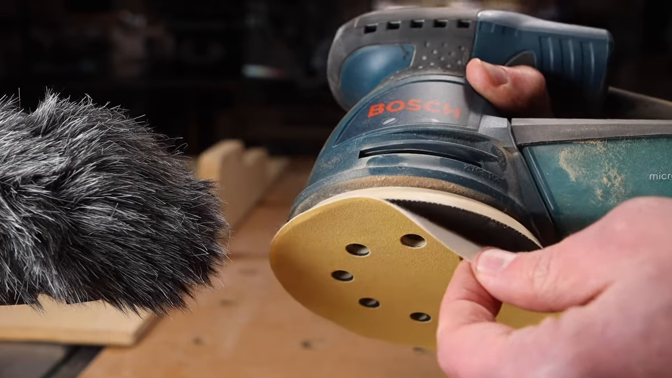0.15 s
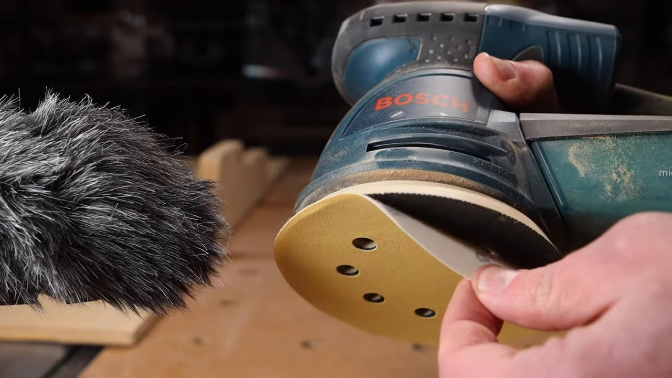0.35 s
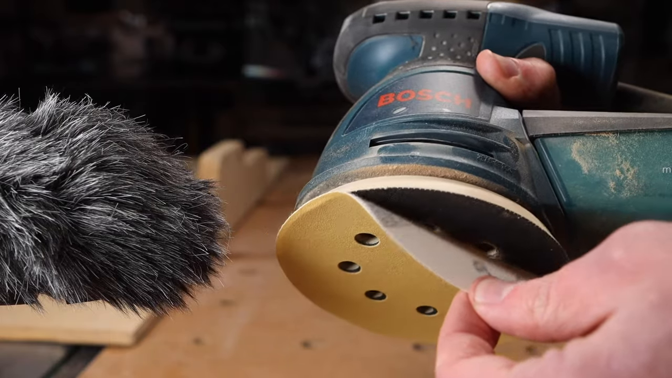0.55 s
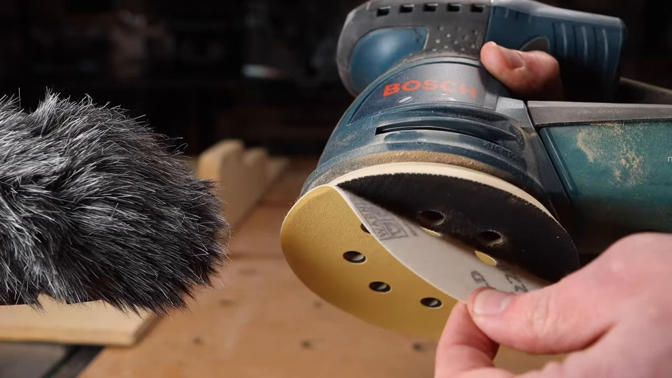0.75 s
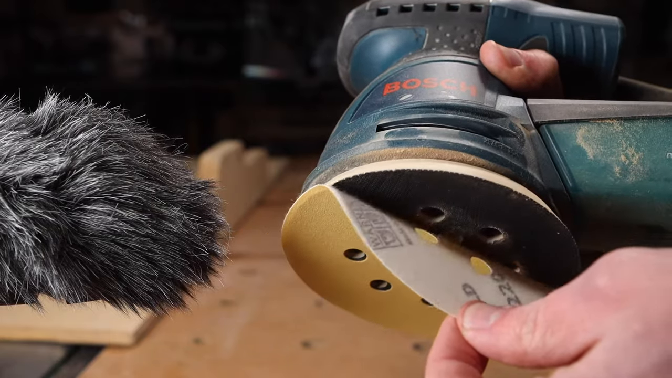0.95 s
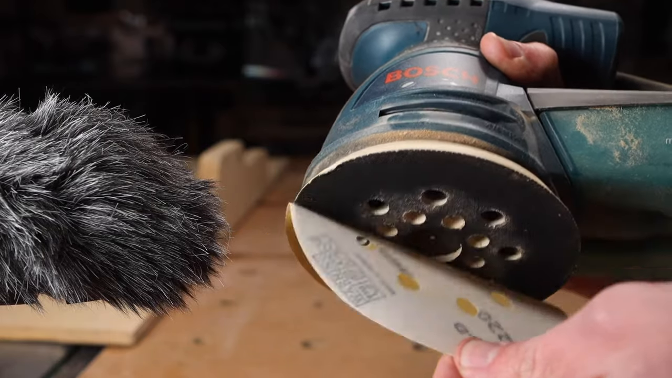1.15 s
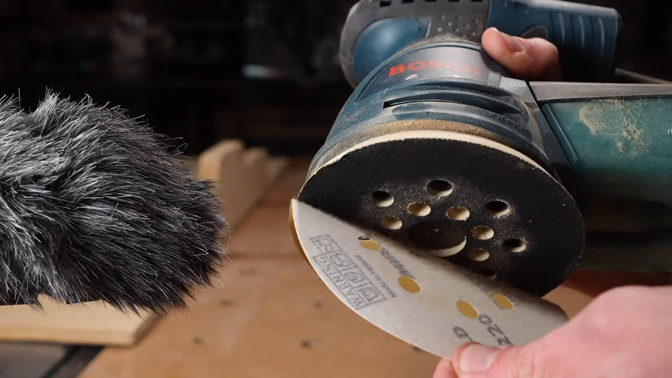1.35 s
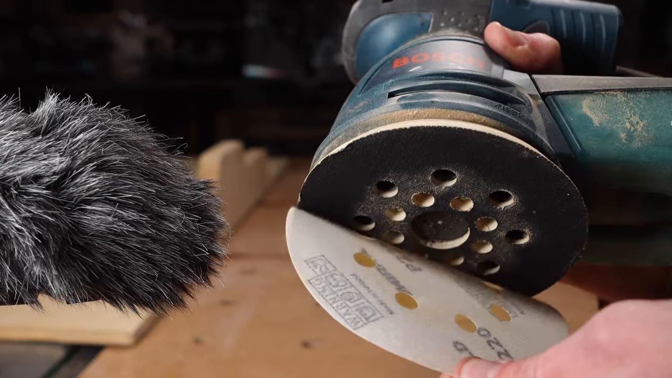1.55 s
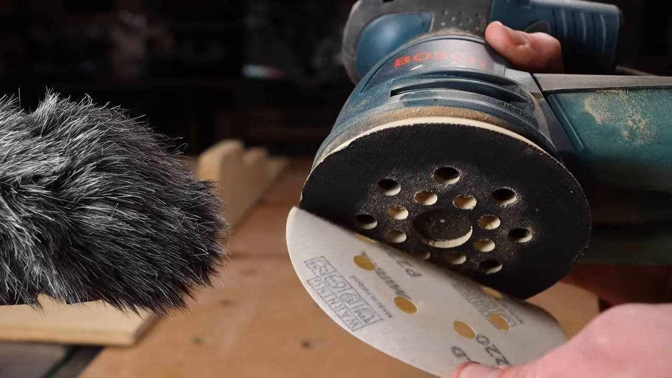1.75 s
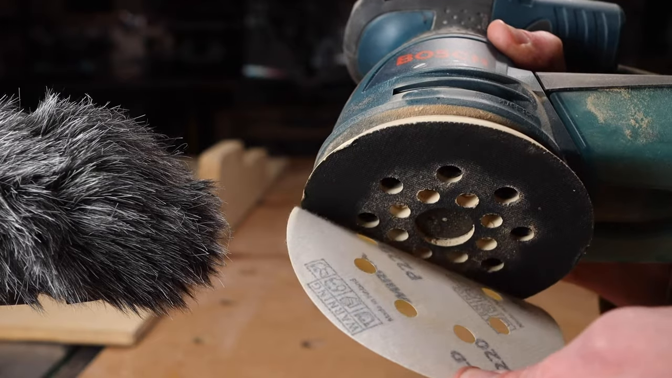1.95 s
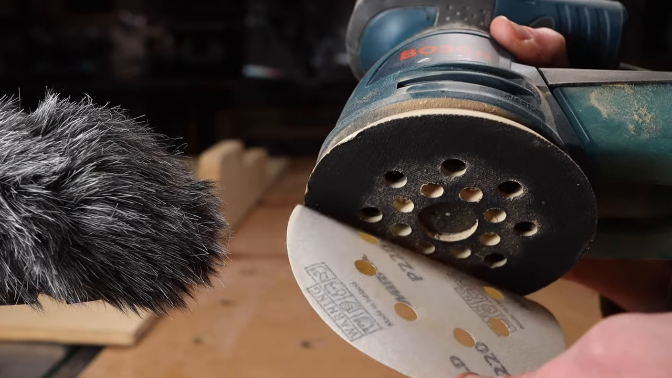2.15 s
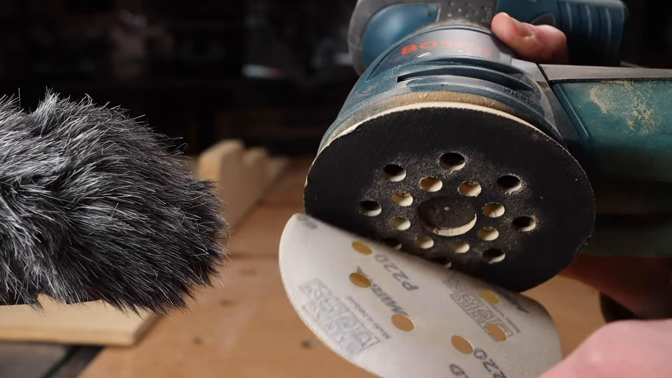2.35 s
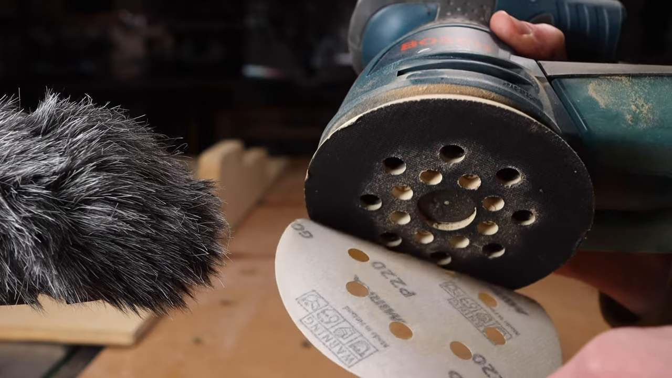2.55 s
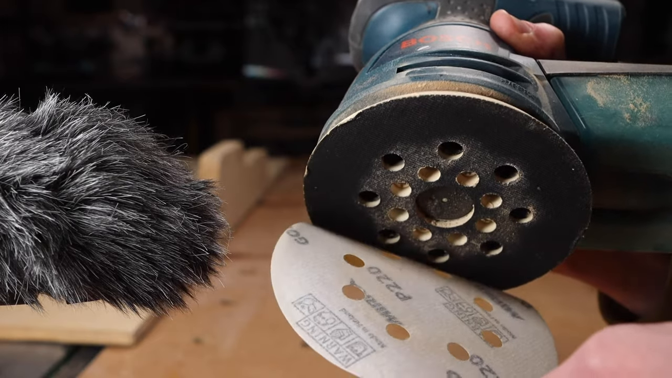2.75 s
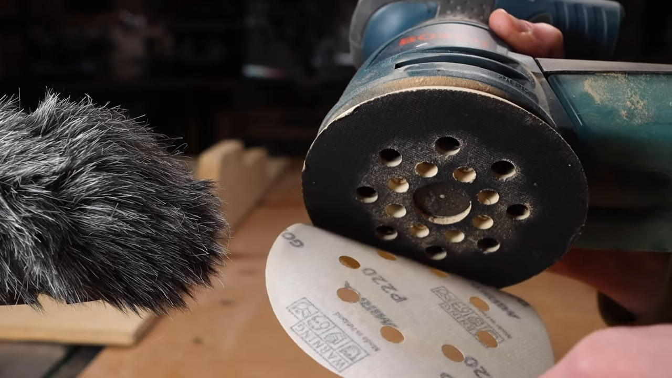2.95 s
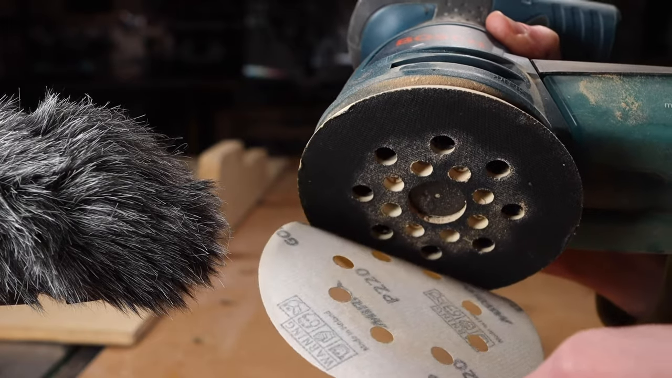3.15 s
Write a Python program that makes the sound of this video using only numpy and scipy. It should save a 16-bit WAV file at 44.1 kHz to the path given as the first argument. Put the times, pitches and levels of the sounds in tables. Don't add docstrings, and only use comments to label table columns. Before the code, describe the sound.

A sanding disc is peeled from a hook-and-loop pad, close up. Sparse snaps lead into a stuttering rip at 0.2-0.5 s, a short strong one near 0.6, then the hardest, densest tear at 0.9-1.2 with low pad rumble. After a pause, a wrench at 1.45; bright uneven snaps from 1.55 to 2.45, weak short rips at 2.5-2.7, then scattered crackles to the end over faint room echo and low hum.

```python
import sys
import numpy as np
from scipy import signal
from scipy.fft import rfft, irfft
from scipy.io import wavfile
from scipy.ndimage import uniform_filter1d, map_coordinates

SR = 44100
rng = np.random.default_rng(int(sys.argv[2]) if len(sys.argv) > 2 else 0)


def unload_audio(sound):
    columns = np.transpose(np.atleast_2d(sound))
    steps = np.round(np.clip(columns, -1, 1) * 32767)
    wavfile.write(sys.argv[1], SR, steps.astype(np.int16))


def amplitude_ratio(level_db):
    exponent = np.asarray(level_db, float) / 20
    return 10 ** exponent


N = 141120

# time_s, strength_db
HARD_PULLS = [
    [(.2, -22.5), (.25, -25.5), (.29, -20), (.36, -24.5), (.42, -29), (.48, -28)],
    [(.572, -25.5), (.635, -18), (.69, -25), (.736, -34)],
    [(.88, -27), (.93, -25.5), (.975, -23.5)],
    [(.99, -25), (1.07, -18.5), (1.1, -18), (1.17, -17.5), (1.227, -20.5)],
    [(1.43, -25), (1.45, -21), (1.5, -18.5), (1.53, -34)],
    [(2.5, -28.5), (2.545, -24.5), (2.62, -30)],
    [(2.652, -28.5), (2.68, -21.5), (2.735, -40)],
]
# start_s, end_s, strength_db
LIGHT_PULLS = [(0, 0.001, -36), (0.011, 0.029, -35), (0.193, 0.188, -43), (0.528, 0.575, -40),
               (.84, 0.842, -29), (1.383, 1.384, -18.5), (1.403, 1.403, -23), (1.423, 1.43, -30),
               (1.539, 1.539, -21), (1.668, 1.73, -37), (1.719, 1.743, -31.5), (1.845, 1.852, -26),
               (2.001, 2.01, -26.5), (2.063, 2.074, -30.5), (2.093, 2.147, -34), (2.224, 2.277, -35.5),
               (2.269, 2.285, -27.5), (2.301, 2.306, -22.5), (2.316, 2.352, -26.5), (2.357, 2.411, -28.5),
               (2.418, 2.428, -28), (2.811, 2.828, -36), (2.911, 2.921, -32), (2.939, 2.95, -26.5),
               (2.953, 2.959, -29.5), (2.966, 2.998, -40.5), (3.142, 3.156, -28), (3.159, 3.166, -32.5)]
# time_s, peak_db
SNAPS = [(0.0045, -13), (0.02, -40), (0.1018, -18.5), (0.114, -21), (0.1267, -30), (0.1334, -16.5),
         (0.1461, -18), (0.1548, -29), (0.1629, -18.5), (0.1761, -11), (0.1826, -14.5), (0.1868, -9),
         (0.486, -20), (0.522, -14), (0.5271, -34), (0.5333, -34), (0.541, -15), (0.547, -5.5),
         (0.564, -21), (0.5684, -12), (0.74, -29), (0.7679, -13.5), (0.778, -17), (0.7818, -36),
         (0.8095, -13.5), (0.8198, -14), (0.8271, -10), (0.843, -10), (0.866, -9.5), (0.8743, -8.5),
         (0.8788, -11), (1.23, -5.5), (1.387, -8), (1.3976, -10.5), (1.4137, -13), (1.4232, -10),
                (1.535, -6), (1.5611, -10.5), (1.5854, -18.5), (1.603, -9), (1.607, -16), (1.6333, -21),
                (1.646, -15), (1.6703, -13.5), (1.68, -5), (1.6952, -8), (1.7069, -7.5), (1.7178, -5),
                (1.7294, -3), (1.7397, -3.5), (1.743, -9), (1.7561, -15), (1.7628, -10.5), (1.7684, -14),
                (1.8322, -7), (1.8484, -25), (1.854, -11), (1.8594, -10), (1.8639, -9),
         (1.87, -9), (1.914, -13), (1.9222, -14), (1.927, -14), (1.9374, -20.5), (1.9595, -21),
               (1.9872, -20.5), (2.0055, -8), (2.026, -19), (2.0392, -14), (2.053, -10.5), (2.0743, -9),
               (2.085, -14), (2.096, -16), (2.109, -8.5), (2.1319, -8.5), (2.202, -18), (2.225, -13.5),
               (2.229, -11), (2.237, -13), (2.2583, -10.5), (2.2883, -8), (2.3028, -24), (2.3293, -13),
               (2.34, -1.5), (2.36, -14), (2.3707, -15), (2.3848, -5), (2.4035, -7.5),
         (2.423, -29), (2.4556, -21), (2.469, -17.5), (2.485, -15), (2.648, -12.5), (2.7563, -24),
              (2.78, -21.5), (2.7952, -6.5), (2.82, -16), (2.842, -15), (2.9, -15), (2.9244, -16),
              (2.9567, -14), (2.978, -13.5), (2.9891, -41), (3.048, -21), (3.065, -18.5), (3.081, -16),
              (3.093, -23), (3.1094, -16), (3.1177, -14), (3.1279, -9), (3.1464, -15), (3.164, -12),
              (3.176, -16), (3.1873, -15), (3.198, -16)]
# middle_s, length_s
STALLS = [(0.2386, 0.0054), (0.25, 0.0041), (0.264, 0.005), (0.2944, 0.0064), (0.3284, 0.0022),
          (0.348, 0.0026), (0.3603, 0.0017), (0.383, 0.0035), (0.402, 0.0029), (0.4165, 0.0028),
          (0.4438, 0.004), (0.4679, 0.002), (0.4743, 0.0026), (0.6227, 0.0027), (0.644, 0.0013),
          (0.6752, 0.0031), (0.689, 0.0046), (0.7136, 0.0026), (0.911, 0.0017), (0.9122, 0.0017),
          (0.9378, 0.0046), (0.95, 0.0014), (0.9558, 0.0025), (1.0057, 0.0039), (1.0253, 0.0026),
          (1.0321, 0.0039), (1.0423, 0.0059), (1.0646, 0.002), (1.079, 0.003), (1.0933, 0.0043),
          (1.1195, 0.0029), (1.142, 0.003), (1.1513, 0.0018), (1.1715, 0.0022), (1.196, 0.0015),
          (1.4633, 0.0026), (1.508, 0.002), (1.521, 0.0044), (2.5169, 0.0021), (2.5547, 0.0035),
          (2.5654, 0.0055), (2.578, 0.0064), (2.594, 0.0056), (2.6046, 0.0029), (2.684, 0.0026),
          (2.715, 0.0022)]
# time_s, level_over_pull_db
SURGES = [(0.228, 10), (0.2443, 9), (0.2795, 0.5), (0.2876, 7.6), (0.3418, 6), (0.369, 2), (0.3972, 2.5),
          (0.4222, 12), (0.4465, 15), (0.4635, 10.5), (0.5909, 8), (0.6034, 0.5), (0.64, 9), (0.6701, 7),
          (0.6858, 7), (0.6942, 11), (0.7185, 12), (0.8886, 0), (0.9, 6.6), (0.9332, 12.5), (0.944, 7.5),
          (0.9654, 4.5), (1.0147, 7.1), (1.0633, 1.5), (1.088, 11), (1.1093, -1), (1.133, 11.5),
          (1.157, 0.5), (1.166, 9.5), (1.2088, 5.5), (1.4408, 9.5), (1.446, 1), (1.453, 8), (1.4788, 1),
          (1.495, 9), (1.5109, 9), (2.5321, 4.5), (2.5573, 12), (2.5714, 11.5), (2.5815, 16), (2.6135, -2),
          (2.6745, 0.5), (2.687, 7), (2.7047, 11)]
# frequency_hz, density_db (per Hz)
HELD_COLOUR = [(400, -31), (900, -7.5), (1570, -3.5), (3040, -3), (6040, 1.5), (7800, -2), (15600, -12)]
# frequency_hz, density_db (per Hz)
FREE_COLOUR = [(400, -46.5), (880, -9.5), (1590, -4), (3560, -5), (5510, -0.5), (7770, -3.5),
               (15600, -13.5)]
# centre_hz, width_hz, gain_db
HELD_RINGS = [(900, 200, -7.5), (1567, 430, 3.5), (3020, 690, 4), (4440, 820, 2.5), (5670, 1250, 0),
              (7720, 510, -5.5)]
# centre_hz, width_hz, gain_db
FREE_RINGS = [(875, 73, -12.5), (1556, 284, 6.5), (3130, 170, 6), (4260, 480, 3.5), (5400, 840, 5),
              (6900, 360, -1), (7950, 570, -3)]
# frequency_hz, t60_s
PAPER_DECAY = [(1500, .024), (6000, .016), (13000, .007)]
# frequency_hz, density_db (per Hz)
RUMBLE_COLOUR = [(60, -40), (150, -11), (260, -1), (400, -1), (600, -10), (800, -20), (1800, -54)]
# centre_hz, width_hz, gain_db
RUMBLE_DIPS = [(377, 30, -5)]
# frequency_hz, density_db (per Hz)
DEEP_COLOUR = [(20, -13), (60, -13.5), (130, -0.5), (200, -3.5), (400, -23)]
# centre_hz, width_hz, gain_db
DEEP_RINGS = [(142, 18, 5)]
# time_s, gain_db
GRIP = [(.2, 0.5), (.3, 6.5), (.45, 7), (.63, 12.5), (.75, 15.5), (.9, 15.5), (1.09, 10), (1.5, 9.5),
        (1.75, 16), (2.35, 10.5), (2.7, 6.5)]
# time_s, ring_hz, level_db
JOLTS = [
    (.31, 110, -46),
    (1.1, 150, -36),
    (1.52, 85, -41),
    (1.75, 78, -46),
    (1.89, 65, -51),
    (2.3, 62, -51),
    (2.97, 124, -47),
]
# frequency_hz, t60_s
ROOM_DECAY = [(300, 0.49), (1400, 0.27), (3000, 0.41), (7000, 0.25), (15000, 0.15)]
# frequency_hz, density_db (per Hz)
AIR_COLOUR = [(25, -7), (60, -5), (130, 2), (370, -0.5), (550, 7), (1100, -12.5), (6000, -5), (16000, -30)]
# frequency_hz, gain_db
BAND_LIMIT = [(12, -30), (45, 0), (15750, 0), (15900, -26), (16700, -30), (16950, -50)]

FULL_DB = -15


def unit(x):
    return x / np.sqrt(np.mean(x ** 2) + 1e-20)


def along(points, hz):
    f, v = np.transpose(points)
    return np.interp(np.log(hz + 1), np.log(f + 1), v)


def wobble(knots_per_s):
    return map_coordinates(rng.standard_normal(4000), [np.arange(N) * knots_per_s / SR])


def causal(spectrum, rings, size=4096):
    hz = np.fft.rfftfreq(size, 1 / SR)
    db = np.maximum(along(spectrum, hz), -90)
    for centre, width, gain in rings:
        db = db + gain / (1 + (2 * (hz - centre) / width) ** 2)
    cepstrum = irfft(np.log(amplitude_ratio(db)))
    fold = np.r_[1, np.full(size // 2 - 1, 2), 1, np.zeros(size // 2 - 1)]
    response = irfft(np.exp(rfft(cepstrum * fold)))
    return response / np.linalg.norm(response)


def dying(decays, size, count):
    hz, t, z = signal.stft(rng.standard_normal((count, size)), SR, nperseg=64)
    damping = amplitude_ratio(-60 * t / along(decays, hz)[:, None])
    tail = signal.istft(z * damping, SR, nperseg=64)[1]
    return tail / np.linalg.norm(tail, axis=1, keepdims=True)


def through(x, response):
    return signal.fftconvolve(x, response, axes=-1)[..., :N]


def strength():
    t, pull_db = np.arange(N) / SR, np.full(N, -120.)
    light = [[(start, end_db[1]), (end_db[0], end_db[1])] for start, *end_db in LIGHT_PULLS]
    for pull in HARD_PULLS + light:
        s, level = np.transpose(pull)
        pull_db = np.maximum(pull_db, np.interp(t, s, level, left=-120, right=-120))
    return pull_db


def jerks():
    stall_db, surge_half_s = -13, .002
    t, db = np.arange(N) / SR, np.zeros(N)
    for middle, length in STALLS:
        db = db + stall_db * np.clip(2 * (1 - np.abs(t - middle) / length), 0, 1)
    for time, over_db in SURGES:
        db = db + over_db * np.exp(-((t - time) / surge_half_s) ** 2)
    return db


def tearing(pull_db):
    hooks_per_s, thin_db = 3800, 36
    size_db, clump_db, clumps_per_s, tear_db = 7.5, 0.5, 300, 0.5
    share = np.clip(amplitude_ratio((pull_db - FULL_DB) * 20 / thin_db), 0, 1) * hooks_per_s / SR
    go = np.clip(4 * (1 - rng.random(N) / (share + 1e-9)), 0, 1)
    hook_db = size_db * rng.exponential(size=N) ** .5
    size = amplitude_ratio(hook_db + clump_db * wobble(clumps_per_s) + jerks())
    return go * unit(size) * amplitude_ratio(pull_db + tear_db) / np.sqrt(share + 1e-9)


def snaps():
    snap_db, row_s, follow_db = -3, .0015, -3
    s, db = np.transpose(SNAPS)
    draw = rng.random((len(s), 2, 6))
    delay = -row_s * (np.log(draw[:, 0] + .01) + .35)
    when = np.c_[s, s[:, None] + delay]
    followers = amplitude_ratio(follow_db - 14 * draw[:, 1])
    size = np.c_[np.ones(len(s)), followers] * amplitude_ratio(db + snap_db)[:, None]
    return np.bincount(np.round(when * SR).astype(int).ravel(), size.ravel(), N + SR)[:N]


def disc(hooks):
    rattle_db, spot_db, spot_s = -1.5, 6, .003
    free_from_s, free_by_s = 1.0, 2.15
    spots = amplitude_ratio(rattle_db) * dying(PAPER_DECAY, size=1500, count=12)
    spots = spots + (np.arange(spots.shape[1]) == 0)
    bands_hz = np.geomspace(1500, 8500, len(spots))
    favoured = [causal([(1, 0)], [(hz, hz / 2, spot_db)], size=256) for hz in bands_hz]
    stay = int(spot_s * SR)
    spot = rng.integers(0, len(spots), N)[np.arange(N) // stay * stay]
    where = spot == np.arange(len(spots))[:, None]
    shaken = -2 * through(hooks * where, through(spots, favoured)).sum(0)
    free = np.interp(np.arange(N) / SR, (free_from_s, free_by_s), [0, 1])
    held_sound = through(shaken * (1 - free), causal(HELD_COLOUR, HELD_RINGS))
    return held_sound + through(shaken * free, causal(FREE_COLOUR, FREE_RINGS))


def pad(pull_db):
    rumble_db, deep_db, growth, lump_db = -26, -5, 1.275, 1
    rumble_lag_s, deep_lag_s = .028, .05
    drive = amplitude_ratio(FULL_DB + growth * (pull_db - FULL_DB))
    grip_db = rumble_db + np.interp(np.arange(N) / SR, *np.transpose(GRIP))
    quick = uniform_filter1d(drive, size=int(rumble_lag_s * SR)) * amplitude_ratio(grip_db + lump_db * wobble(70))
    slow = uniform_filter1d(drive, size=int(deep_lag_s * SR)) * amplitude_ratio(grip_db + deep_db)
    paper = through(quick * rng.standard_normal(N), causal(RUMBLE_COLOUR, RUMBLE_DIPS, size=8192))
    deep = through(slow * rng.standard_normal(N), causal(DEEP_COLOUR, DEEP_RINGS, size=8192))
    return paper + deep


def jolts():
    half_swing_s = .03
    s, hz, db = np.transpose(JOLTS)[..., None]
    t = np.arange(N) / SR - s
    swell = amplitude_ratio(db) * np.exp(-(t / half_swing_s) ** 2)
    return (swell * np.sin(2 * np.pi * hz * t)).sum(0)


def room(near):
    room_db, predelay, stretch = -20, 300, 5000
    tails = dying(ROOM_DECAY, size=SR // 2, count=4)
    part = (np.arange(N) // stretch % 4) == np.arange(4)[:, None]
    delayed = np.pad(near, (predelay, 0))[:N]
    return amplitude_ratio(room_db) * through(delayed * part, tails).sum(0)


def air():
    air_db, hum_hz, hum_db = -57, 122, -70
    phase = 2 * np.pi * hum_hz * np.arange(N) / SR + 1.5 * wobble(6)
    hum = amplitude_ratio(hum_db + 4 * wobble(9)) * np.sin(phase)
    return amplitude_ratio(air_db) * through(rng.standard_normal(N), causal(AIR_COLOUR, [])) + hum


def scene():
    pull_db = strength()
    hooks = tearing(pull_db) / 2 + snaps()
    near = disc(hooks) + pad(pull_db) + jolts()
    return (near + room(near) + air())[None]


def top_cut(x):
    return signal.sosfilt(signal.butter(12, 16990, fs=SR, output="sos"), x)


def record(dry):
    soft = dry / (1 + np.abs(dry / .8) ** 3) ** (1 / 3)
    band_gain = amplitude_ratio(along(BAND_LIMIT, np.fft.rfftfreq(N, 1 / SR)))
    mix = irfft(rfft(soft) * band_gain, N)
    return top_cut(mix)


dry = scene()
out = record(dry)
unload_audio(out)
```